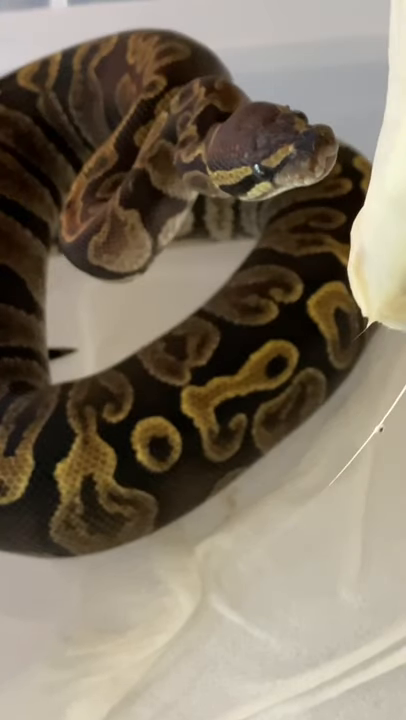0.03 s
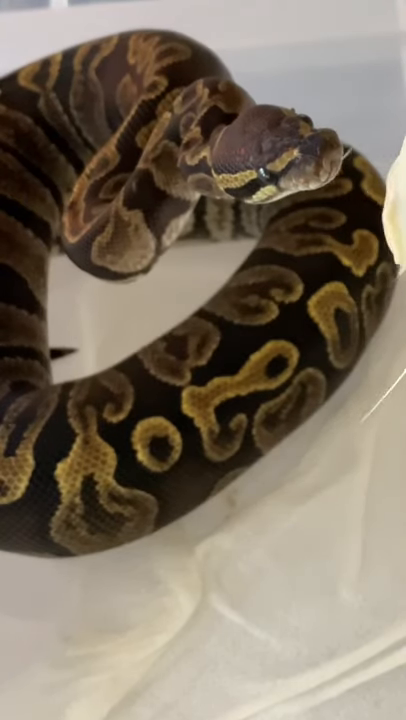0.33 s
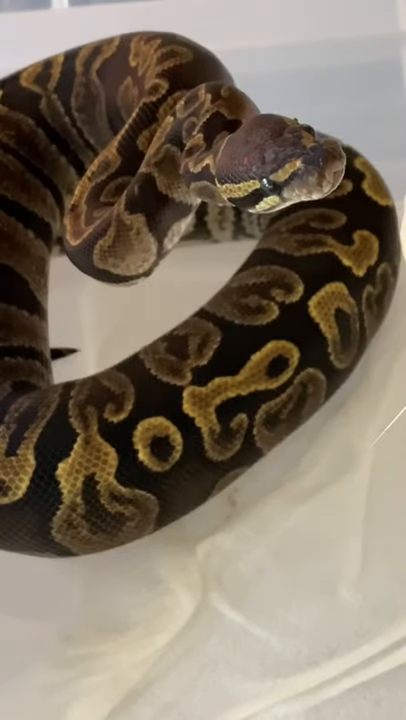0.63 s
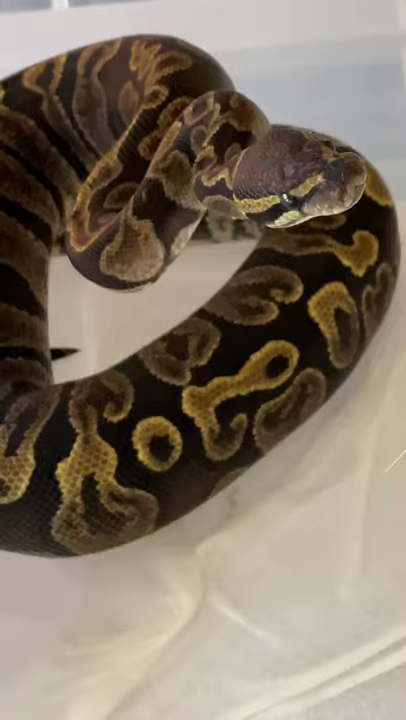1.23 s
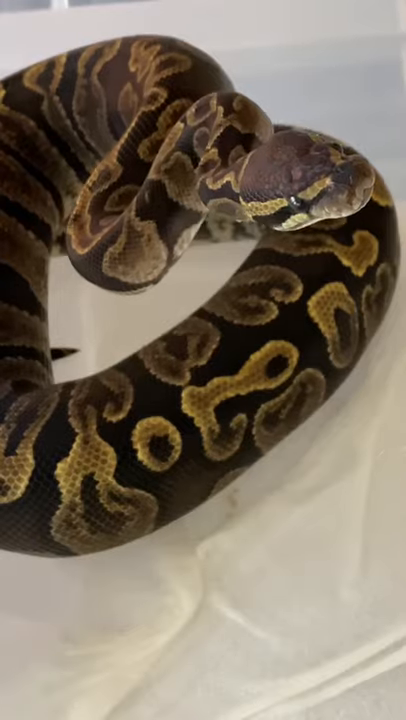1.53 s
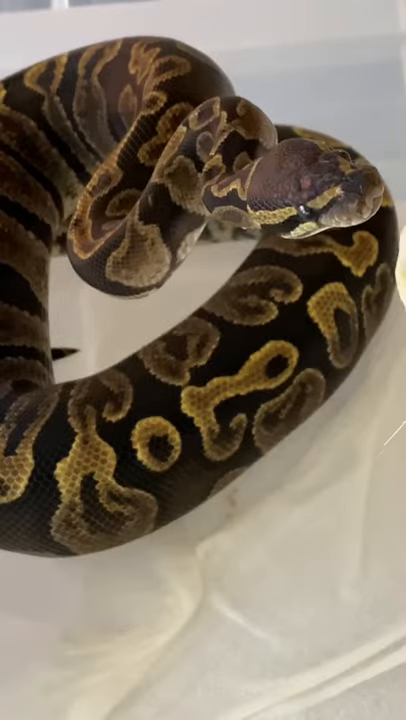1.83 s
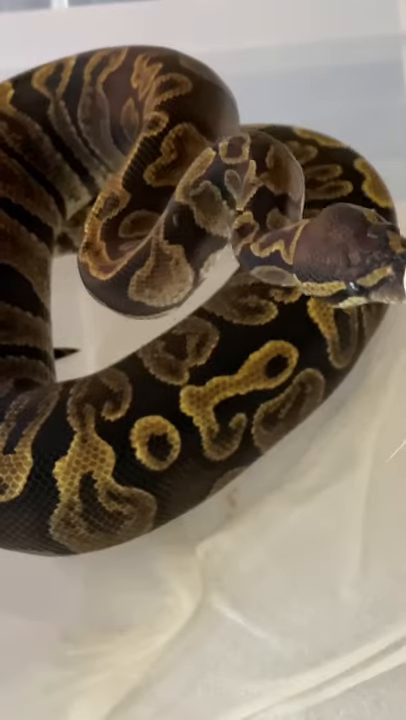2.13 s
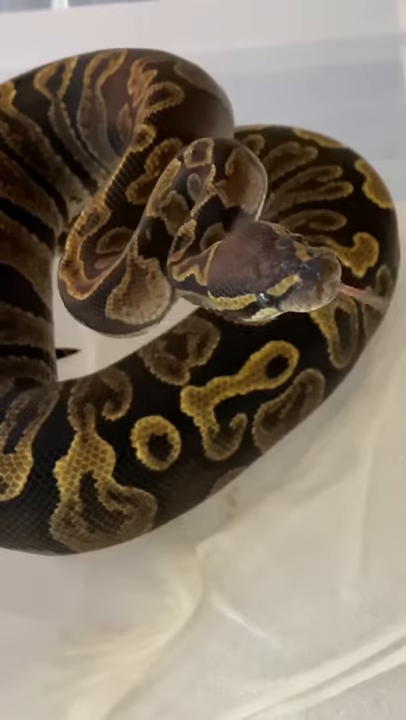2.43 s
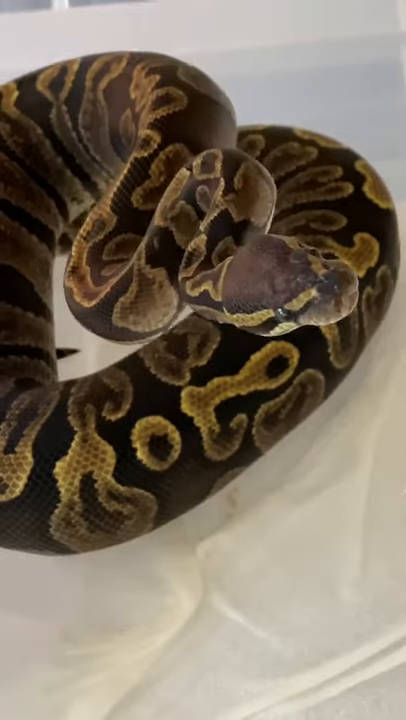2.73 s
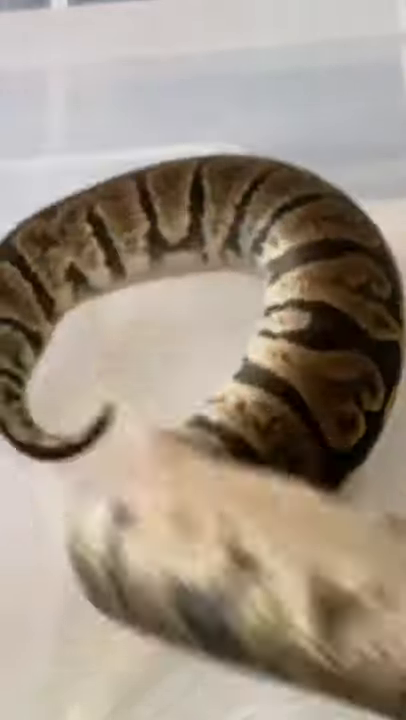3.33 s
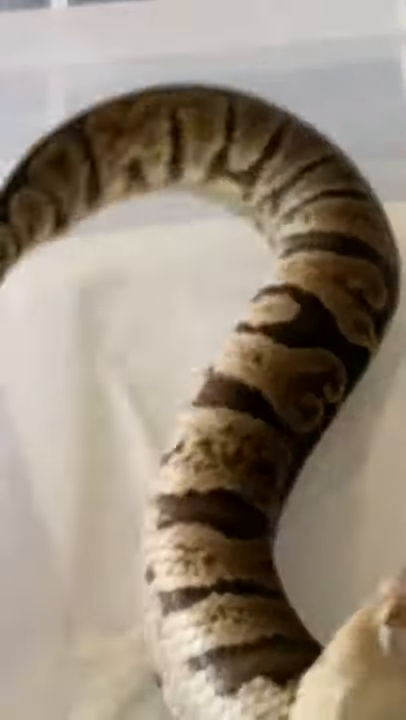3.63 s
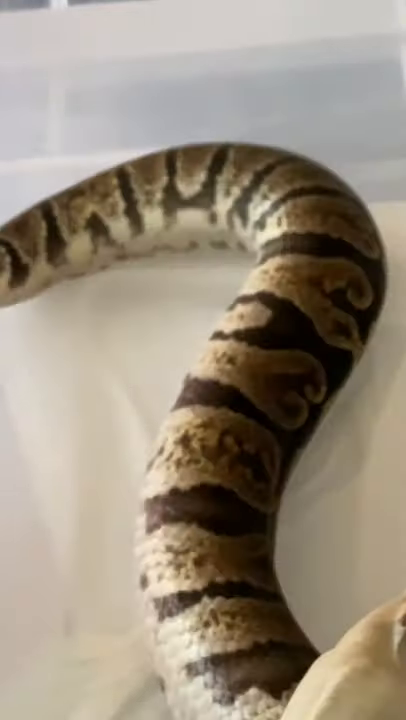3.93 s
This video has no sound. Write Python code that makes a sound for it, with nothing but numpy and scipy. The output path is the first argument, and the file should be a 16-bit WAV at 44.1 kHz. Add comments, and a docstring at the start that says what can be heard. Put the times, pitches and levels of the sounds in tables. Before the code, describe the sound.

Close, hollow thumps and knocks come from a snake striking inside a plastic tub. Low room rumble and faint ticks come first, then two quick flurries of bumping and scraping, the second heavier, and a brief slide.

```python
"""A python lunges in a thin plastic tub, heard up close. After a few faint taps its scales scrape and snap
over the plastic, and its body knocks the wall and sets it ringing. Half a second later the coils land
heavily: the tub floor thumps and booms, then they slide and settle with a grainy hiss.
Behind it lies a bed of humming appliance motors and room rumble."""
import sys
import numpy as np
from scipy import signal
from scipy.fft import rfft, irfft, next_fast_len
from scipy.io import wavfile
from scipy.ndimage import map_coordinates

SR = 44100
rng = np.random.default_rng(int(sys.argv[2]) if len(sys.argv) > 2 else 0)


def unload_wav(signal):
    """Save mono or channel-first audio to the path in sys.argv[1] as 16-bit WAV at rate SR, clipped to [-1, 1]."""
    wavfile.write(
        sys.argv[1],
        SR,
        np.round(np.clip(np.atleast_2d(signal).T, -1, 1) * 32767).astype(np.int16),
    )


N = 176400

# appliance motor tones (frequency [Hz], rms level [dB])
HUM_TONES = [(56.5, -52), (75, -69.5), (112.5, -56.5), (117.2, -52), (131.5, -59.5), (234.4, -64.5),
             (240, -63), (258.5, -68.5), (720.5, -76)]
# room tone EQ (frequency [Hz], relative gain [dB])
ROOM_EQ = [(20, -23), (33, -9), (52, 3.5), (90, -5), (135, -4), (175, 0), (205, -14), (260, -9), (310, -14),
           (360, -13.5), (430, -21.5), (640, -25.5), (740, -24), (1050, -37), (1400, -42), (2000, -44),
           (3500, -53.5), (7000, -55), (11000, -56), (15500, -73)]
# fade of the opening rustle (time [s], level [dB])
RUSTLE_FADE = [(0, -57), (.03, -65.5), (.09, -86), (.15, -120)]
# rustle EQ (frequency [Hz], relative gain [dB])
RUSTLE_EQ = [(500, 14), (2500, -6.5), (4500, -1.5), (7500, -7), (10000, -19)]
# taps before the lunge (time [s], relative tick level [dB], relative bump level [dB],
# treble tilt [dB/octave], peak frequency [Hz], peak gain [dB], peak width [octaves], ring t60 [s])
TAP_CUES = [(.433, -49, -46.5, -0.5, 930, 7, 0.31, 0.19), (.962, -61, -46, -6, 5630, 24.5, 0.1, 0.094),
            (1.417, -66.5, -46, 2.5, 6130, 5, 0.25, 0.17), (1.46, -61, -62, -5, 1630, 11, 0.27, 0.3),
            (1.989, -63.5, -53.5, 3.5, 7400, 1, 0.34, 0.11), (2.536, -57, -55, 1.5, 3220, 12, 0.26, 0.18)]
# tick EQ (frequency [Hz], relative gain [dB])
TAP_EQ = [(100, -22), (400, -3), (1000, 7.5), (2300, 6), (4000, -8.5), (6000, -10.5), (10000, -9.5),
          (15000, -23.5)]
# fades of the sliding body (time [s], scale hiss level [dB], wall rub level [dB])
SLIDE_FADES = [(2.875, -100, -100), (2.895, -58.5, -57), (2.96, -60, -52), (3.02, -72.5, -50.5),
               (3.07, -67, -65.5), (3.12, -68.5, -61), (3.2, -68, -64.5), (3.31, -75.5, -69),
               (3.365, -67.5, -68), (3.395, -62.5, -40), (3.43, -54.5, -43), (3.47, -54, -53),
               (3.5, -61, -58), (3.57, -69, -60), (3.66, -103, -68.5), (3.705, -83, -68.5),
               (3.75, -84, -78), (3.84, -101, -99)]
# scale hiss EQ (frequency [Hz], relative gain [dB])
HISS_EQ = [(500, -5), (1500, -5.5), (2200, 0.5), (4000, -1.5), (6500, -3), (9000, -0.5), (12000, -12),
           (15500, -16)]
# rubbed wall EQ (frequency [Hz], relative gain [dB])
RUB_EQ = [(100, -5), (190, 13), (280, 12.5), (470, -0.5), (620, -3), (790, 1), (1050, -3.5), (1240, -5.5),
          (1550, -10.5), (1950, -3.5), (3000, -17), (4500, -20.5), (12000, -60)]
# scales and teeth snapping on plastic (time [s], relative level [dB])
SNAP_CUES = [(2.892, -42.5), (2.907, -43), (2.943, -50), (3.082, -41.5), (3.089, -50), (3.11, -46.5),
             (3.117, -54), (3.164, -43.5), (3.172, -56), (3.199, -58), (3.227, -53), (3.456, -49),
             (3.512, -57), (3.549, -50), (3.563, -49)]
# snap EQ (frequency [Hz], relative gain [dB])
SNAP_EQ = [(300, -28), (1500, -17), (3000, -5), (5500, -7.5), (8500, -0.5), (12000, -5.5), (15500, -13.5)]
# wall knocks (time [s], relative level [dB], treble tilt [dB/octave], pitch of the struck spot [Hz])
KNOCK_CUES = [(2.916, -45.5, 3, 1330), (2.953, -34, 1.5, 1920), (2.992, -32.5, -4, 1880),
              (3.011, -41, -2, 1950), (3.056, -36, -8.5, 1870), (3.137, -44, -4.5, 627),
              (3.373, -33.5, 6, 2520), (3.379, -35.5, -6.5, 910), (3.391, -31.5, -15, 856),
              (3.399, -34.5, 3, 940), (3.414, -43, 8, 1230), (3.423, -38.5, 5, 1190),
              (3.431, -31.5, -6, 700), (3.448, -39.5, 4, 1250), (3.468, -35, 2, 2860),
              (3.572, -36, -3.5, 1050), (3.633, -53.5, -1.5, 1340), (3.694, -43.5, -3, 720),
              (3.773, -55.5, -11, 1800), (3.928, -66, 4.5, 2560)]
# struck wall EQ (frequency [Hz], relative gain [dB])
WALL_EQ = [(150, 1), (450, 8), (620, 4.5), (790, 10), (1050, 0), (1240, 7.5), (1550, -7), (1930, 0.5),
           (2600, -1.5), (4000, -7.5), (6500, -12), (10000, -24.5), (15000, -33)]
# modes of the tub wall (frequency [Hz], relative level [dB], t60 [s])
WALL_RESONANCES = [(671, -21, 0.21), (746, -11, 0.16), (790, -28.5, 0.15), (907, -24, 0.16),
                   (1171, -25, 0.14), (1245, -21, 0.12), (1904, -21.5, 0.12), (2070, -29, 0.12),
                   (2280, -30, 0.097)]
# the body's weight hitting the floor (time [s], relative level [dB], low-pass corner [Hz])
THUMP_CUES = [(2.89, -42.5, 380), (2.915, -38.5, 300), (2.955, -36, 320), (2.993, -40, 420),
              (3.019, -43, 300), (3.061, -40, 230), (3.379, -27.5, 350), (3.387, -27.5, 336),
              (3.399, -29, 560), (3.416, -39.5, 280), (3.428, -27.5, 150), (3.445, -33.5, 240),
              (3.462, -32.5, 210), (3.597, -38, 176), (3.698, -40.5, 198)]
# modes of the loaded tub floor (frequency [Hz], relative level [dB], t60 before extra damping [s])
FLOOR_RESONANCES = [(73.6, 1, 0.14), (105, -6.5, 0.094), (135.5, -2, 0.16), (179.5, -2.5, 0.12),
                    (237.4, -2, 0.14), (275, -2, 0.14), (303.5, -5, 0.18), (374, -13, 0.059),
                    (430, -15.5, 0.079), (456, -8, 0.18), (548, -13.5, 0.14), (611, -16, 0.098)]
# stereo width of the diffuse sound (frequency [Hz], side gain [dB])
SIDE_EQ = [(60, -9), (150, -10.5), (300, -9.5), (550, -8.5), (800, -4.5), (1250, -2), (1800, -8),
           (2700, -18.5), (6000, -20), (15000, -6.5)]
# treble phase spread between the channels (frequency [Hz], phase difference [rad])
PHASE_SPREAD = [(0, 0), (6800, 0), (8500, np.pi), (10200, 2 * np.pi), (12150, 3 * np.pi),
                (14100, 4 * np.pi), (16000, 5 * np.pi)]

ROOM_TONE_DB, HUM_WAVER_DB = -52, 2
REVERB_T60_S, REVERB_DB = 0.32, -13
LOW_CUT_HZ, TOP_HZ = 38, 15800
HIT_SAMPLES = 8192
LOAD_DETUNE = 0.016  # share by which the shifting coils retune the floor from blow to blow


def amp(db):
    """Decibels to gain."""
    return 10 ** (np.asarray(db) / 20)


def unit(x):
    """Scale to rms 1."""
    return x / np.sqrt(np.mean(x ** 2) + 1e-20)


def eq_db(eq, hz):
    """Read an EQ curve on a log frequency axis."""
    knots_hz, db = np.transpose(eq)
    return np.interp(np.log(hz + 1), np.log(knots_hz + 1), db)


def fades(rows):
    """One value per sample for each column after the time."""
    times, *columns = np.transpose(rows)
    return [np.interp(np.arange(N) / SR, times, column) for column in columns]


def wobble(rate):
    """A smooth random curve, rate knots a second."""
    return map_coordinates(rng.standard_normal(N // 50), [np.arange(N) * rate / SR], mode="wrap")


def filtered(x, response):
    """Filter x by a response given as a function of frequency."""
    size = next_fast_len(N + SR // 2)
    return irfft(rfft(x, size) * response(np.fft.rfftfreq(size, 1 / SR)), size)[..., :N]


def coloured(x, eq):
    """x through an EQ, at rms 1."""
    return unit(filtered(x, lambda hz: amp(eq_db(eq, hz))))


def add(track, s, sound):
    """Mix a sound in at s seconds."""
    start = round(s * SR)
    part = sound[:N - start]
    track[start:start + len(part)] += part


def room_tone():
    """A steady bed of rumble and hiss."""
    return amp(ROOM_TONE_DB) * coloured(rng.standard_normal(N), ROOM_EQ)


def hum():
    """Appliance motors drone, each tone wavering a little in level and pitch."""
    t = np.arange(N) / SR
    out = np.zeros(N)
    for hz, db in HUM_TONES:
        peak = np.sqrt(2) * amp(db + HUM_WAVER_DB * wobble(5.6))
        out += peak * np.sin(2 * np.pi * (hz * t + rng.random()) + 0.14 * wobble(2.6))
    return out


def reverb(x, t60):
    """Dense reflections: x through a decaying noise tail of energy 1."""
    t = np.arange(SR // 2) / SR
    tail = rng.standard_normal(len(t)) * amp(-60 * t / t60) * (1 - np.exp(-t / .004))
    return signal.fftconvolve(x, tail / np.linalg.norm(tail))[:N]


def rustle():
    """A brief, soft rustle at the start."""
    return amp(fades(RUSTLE_FADE)[0]) * coloured(rng.standard_normal(N), RUSTLE_EQ)


def contact(eq, tilt_db, spot_hz, spot_db, crack_s, ring_s, ring_db, spot_octaves=0.35):
    """A hit on plastic: a short crack and a diffuse ring, coloured by the struck spot's resonance."""
    t, hz = np.arange(HIT_SAMPLES) / SR, np.fft.rfftfreq(HIT_SAMPLES, 1 / SR)
    spot = spot_db * np.exp(-.5 * (np.log2((hz + 1) / spot_hz) / spot_octaves) ** 2)
    tilt = tilt_db * np.log2(np.maximum(hz, 700) / 700)
    # a minimum-phase EQ keeps the attack sharp
    cepstrum = irfft(np.log(amp(eq_db(eq, hz) + spot + tilt)))
    cepstrum[1:HIT_SAMPLES // 2] *= 2
    cepstrum[HIT_SAMPLES // 2 + 1:] = 0
    decay = amp(-60 * t / crack_s) + amp(ring_db - 60 * t / ring_s)
    burst = rng.standard_normal(HIT_SAMPLES) * decay
    hit = irfft(rfft(burst) * np.exp(rfft(cepstrum)))
    return hit / np.sqrt(np.sum(hit ** 2) / (.003 * SR))  # the energy of 3 ms at rms 1


def floor_ring(corner_hz, attack_s, damping=1.0):
    """One push starts all the floor's modes; a soft contact favours the low ones, a hard one the upper."""
    t = np.arange(2 * HIT_SAMPLES) / SR
    ring = np.zeros(len(t))
    for hz, db, t60 in FLOOR_RESONANCES:
        drive = 1 / np.hypot(1, (hz / corner_hz) ** 2) / np.hypot(1, corner_hz / hz / 3)
        loaded_hz = hz * (1 + LOAD_DETUNE * rng.standard_normal())
        ring += drive * amp(db - 60 * t * damping / t60) * np.sin(2 * np.pi * loaded_hz * t)
    ring *= 1 - np.exp(-t / attack_s)
    return ring / np.sqrt(np.mean(ring[t < .02] ** 2))


def taps():
    """Faint ticks while the snake waits, each layered over a dull bump of the floor."""
    out = np.zeros(N)
    for s, tick_db, bump_db, tilt_db, hz, spot_db, octaves, ring_s in TAP_CUES:
        tick = contact(TAP_EQ, tilt_db, hz, spot_db,
                       crack_s=0.011, ring_s=ring_s, ring_db=-10.5, spot_octaves=octaves)
        add(out, s, amp(tick_db - 2.5) * tick)
        add(out, s, amp(bump_db - 1.5) * floor_ring(corner_hz=332, attack_s=0.0012, damping=1.1))
    return out


def scrape(level_db, eq, grains_per_s, uneven_db):
    """Scale edges catch and slip: tiny grains over a smooth hiss, in uneven bursts."""
    grains = (rng.random(N) < grains_per_s / SR) * rng.standard_normal(N)
    friction = unit(grains) + rng.standard_normal(N)
    return amp(level_db + uneven_db * wobble(130)) * coloured(friction, eq)


def slide():
    """Sliding scales give a bright hiss and rub a darker tone out of the wall."""
    hiss_db, rub_db = fades(SLIDE_FADES)
    hiss = scrape(hiss_db, HISS_EQ, grains_per_s=1300, uneven_db=2.5)
    rub = scrape(rub_db, RUB_EQ, grains_per_s=560, uneven_db=3.0)
    return hiss + rub


def scuff(start_s=3.324, length_s=0.029, pitch_hz=530, half_width_hz=86, db=-48.5):
    """Skin drags on the wall and stirs one resonance just before the coils land."""
    progress = np.clip((np.arange(N) / SR - start_s) / length_s, 0, 1)
    swell = np.sqrt(np.abs(np.sin(np.pi * progress)))
    drag = filtered(rng.standard_normal(N), lambda hz: 1 / (1 + ((hz - pitch_hz) / half_width_hz) ** 2))
    return amp(db) * swell * unit(drag)


def snaps():
    """Scales and teeth click on the plastic: short, bright transients."""
    out = np.zeros(N)
    for s, db in SNAP_CUES:
        snap = contact(SNAP_EQ, tilt_db=0, spot_hz=rng.uniform(5100, 5800), spot_db=8.5,
                       crack_s=0.0094, ring_s=0.058, ring_db=-21.5)
        add(out, s, amp(db - 9) * snap)
    return out


def wall_ring():
    """The wall's modes, stirred a little differently by each knock."""
    t = np.arange(HIT_SAMPLES) / SR
    ring = np.zeros(len(t))
    for hz, db, t60 in WALL_RESONANCES:
        decay = amp(db + rng.normal(0, 2.4) - 60 * t / t60)
        ring += decay * np.sin(2 * np.pi * (hz * t + rng.random()))
    return ring


def knocks():
    """The thrashing body strikes the thin wall: a crack on top of a hollow ring."""
    out = np.zeros(N)
    for s, db, tilt_db, hz in KNOCK_CUES:
        crack = contact(WALL_EQ, tilt_db, hz, spot_db=9, crack_s=0.012, ring_s=0.077, ring_db=-15)
        add(out, s, amp(db - 8) * (crack + wall_ring()))
    return out


def boom(start_s=3.413, pitch_hz=67.2, peak_db=-29.5, rise_s=0.018):
    """The whole tub flexes under the landing: a bass swell that dies within a few cycles."""
    t = np.maximum(np.arange(N) / SR - start_s, 0)
    swell = t / rise_s * np.exp(1 - t / rise_s)
    return amp(peak_db) * swell * np.sin(2 * np.pi * pitch_hz * t)


def thumps():
    """The python's weight hits the tub floor, first in the lunge, then harder as the coils land."""
    out = np.zeros(N)
    for s, db, corner_hz in THUMP_CUES:
        add(out, s, amp(db - 4.5) * floor_ring(corner_hz, attack_s=0.0024))
    return out


def scene():
    """Snake and hum sit in the centre; reflections inside the tub and room tone add a little width."""
    snake = rustle() + taps() + snaps() + knocks() + thumps() + slide() + scuff() + boom()
    mid = snake + amp(REVERB_DB) * reverb(snake, REVERB_T60_S) + hum() + room_tone()
    diffuse = reverb(snake, t60=0.025) + room_tone()
    side = filtered(diffuse, lambda hz: amp(eq_db(SIDE_EQ, hz)))
    return np.array([mid + side, mid - side])


def record(dry):
    """Master chain: soft ends, a low cut, a hard top cut and a phase spread in the treble."""
    def response(hz):
        half_spread = np.interp(hz, *np.transpose(PHASE_SPREAD)) / 2
        phase_turn = np.exp(1j * np.outer([-1, 1], half_spread))
        low_cut = 1 / np.hypot(1, (LOW_CUT_HZ / (hz + 1)) ** 4)
        return phase_turn * low_cut * (hz < TOP_HZ)

    return filtered(dry * signal.windows.tukey(N, .001), response)


dry = scene()
out = record(dry)
unload_wav(out)
```